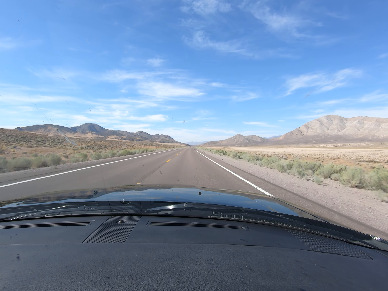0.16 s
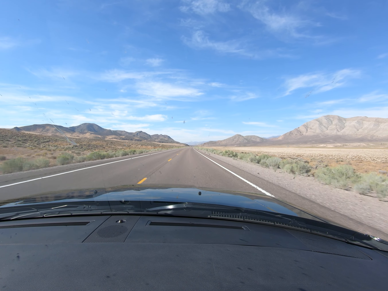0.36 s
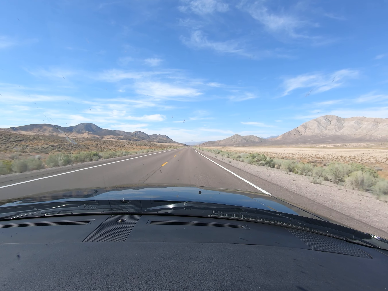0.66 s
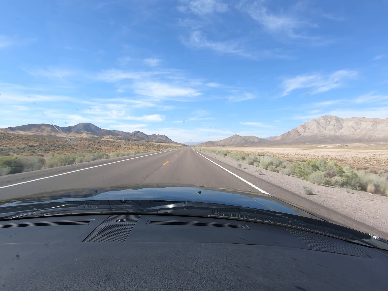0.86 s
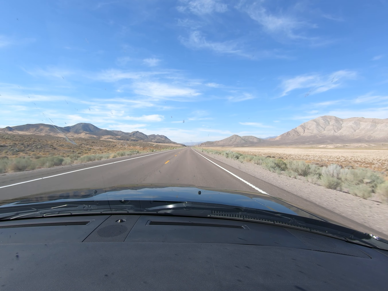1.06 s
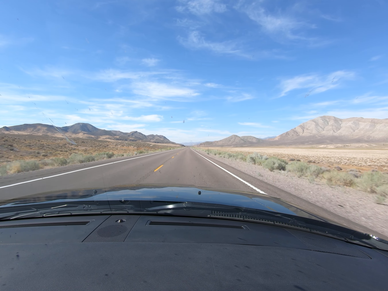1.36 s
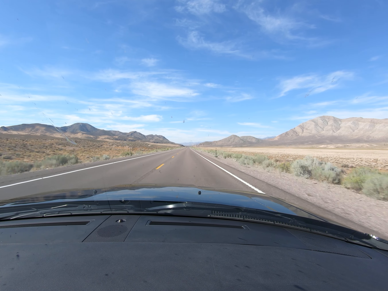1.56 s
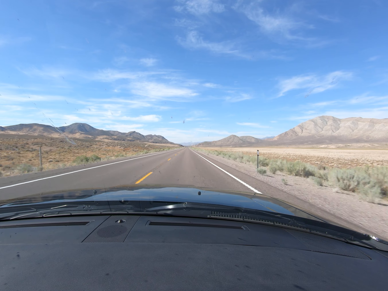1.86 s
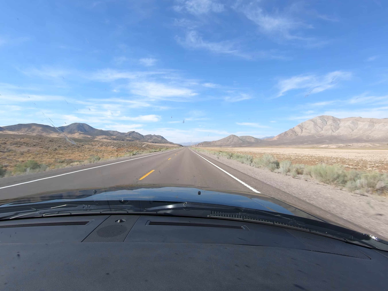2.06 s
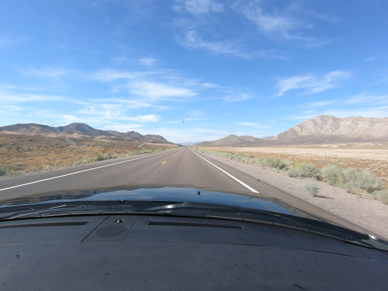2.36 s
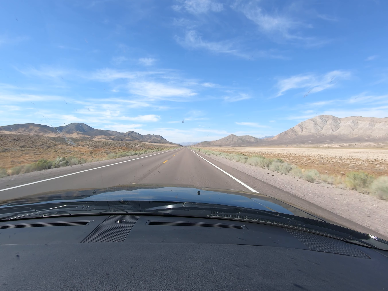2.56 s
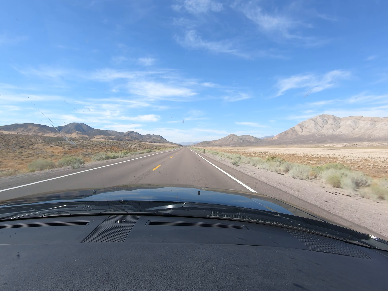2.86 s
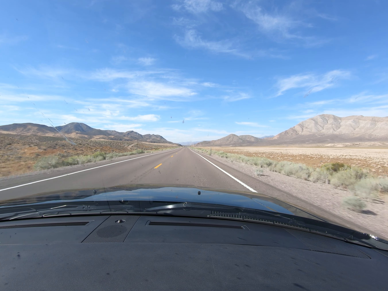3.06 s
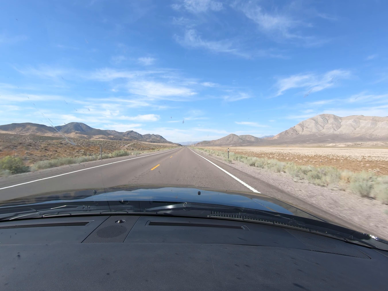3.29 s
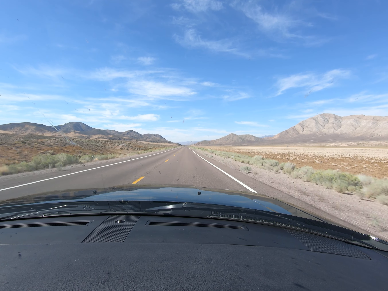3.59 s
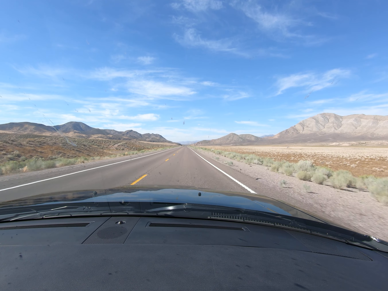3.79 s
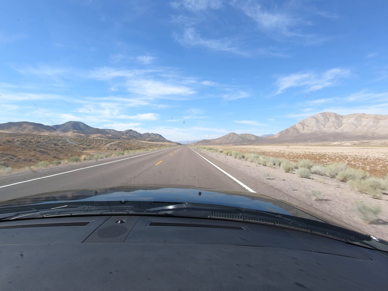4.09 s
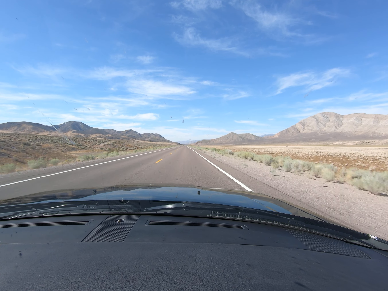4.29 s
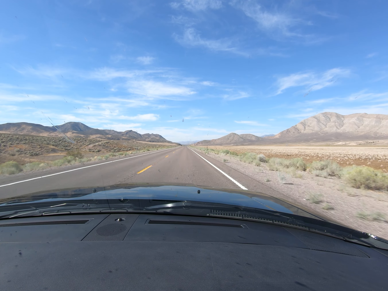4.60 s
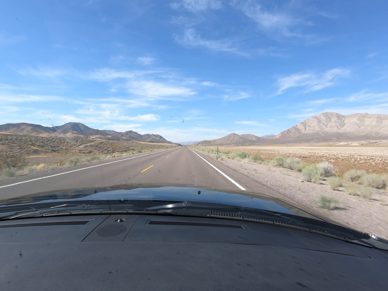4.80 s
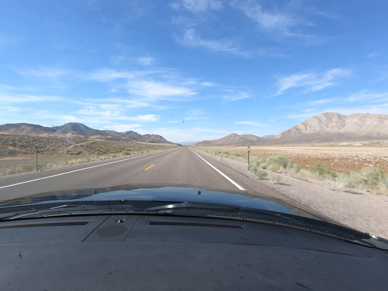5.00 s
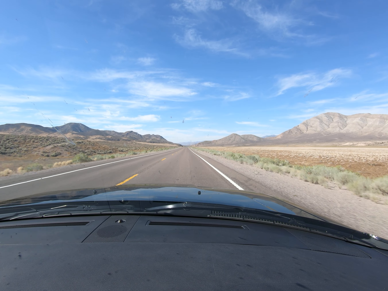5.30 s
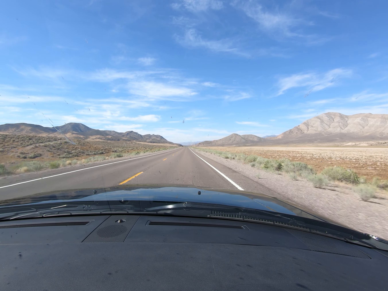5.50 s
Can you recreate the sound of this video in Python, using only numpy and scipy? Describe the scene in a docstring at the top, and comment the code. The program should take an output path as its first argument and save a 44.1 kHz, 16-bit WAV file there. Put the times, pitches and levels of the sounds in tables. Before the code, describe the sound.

A low, bass-heavy car cabin drone with an engine boom rising then backing off, faint air hiss, road thumps and tiny plastic ticks.

```python
"""Inside a car at steady highway speed, heard from a camera microphone behind the windscreen.
Road noise rumbles through the body, tyres hum at multiples of the wheel's turn, and air hisses over the glass.
The engine's shaft tones rise for about three seconds, then ease back under the road noise.
The deep rumble swells softly, ridges drum, a window seal sings, loose plastic knocks, and the trim ticks.
The camera limits the bass and cuts the highest treble."""
import sys
import numpy as np
from scipy import signal
from scipy.fft import rfft, irfft, next_fast_len
from scipy.io import wavfile
from scipy.ndimage import uniform_filter1d, minimum_filter1d, map_coordinates

SR = 44100
rng = np.random.default_rng(int(sys.argv[2]) if len(sys.argv) > 2 else 0)


def waveform_to_disk(signal):
    """Save audio, clipped to [-1, 1], as 16-bit WAV at the path in sys.argv[1]."""
    frames = np.transpose(np.atleast_2d(signal))
    scaled = np.clip(frames, -1, 1) * 32767
    samples = np.round(scaled).astype(np.int16)
    wavfile.write(sys.argv[1], SR, samples)


N = 249165


def amp(db):
    """Decibels to gain."""
    return 10 ** (np.asarray(db) / 20)


def unit(x):
    """Scaled to rms 1."""
    return x / np.sqrt(np.mean(x ** 2) + 1e-20)


def curves(rows):
    """One value per sample for each column after the time."""
    s, *cols = np.transpose(rows)
    return [np.interp(np.arange(N) / SR, s, c) for c in cols]


def wobble(rate):
    """A smooth random curve, rate knots a second."""
    knots = rng.standard_normal(int(N * rate / SR) + 4)
    return map_coordinates(knots, [np.arange(N) * rate / SR])


def swell(s, width):
    """A bell-shaped rise to 1 around time s, down to 1/e one width (s) away."""
    return np.exp(-((np.arange(N) / SR - s) / width) ** 2)


def filtered(x, response):
    """x with its spectrum multiplied by a response of frequency."""
    m = next_fast_len(N + SR // 2)
    return irfft(rfft(x, m) * response(np.fft.rfftfreq(m, 1 / SR)), m)[:N]


def noise(spectrum):
    """Noise of rms 1, coloured by (Hz, relative dB) points on a log frequency axis."""
    f, db = np.transpose(spectrum)

    def colour(hz):
        return amp(np.interp(np.log(hz + 1), np.log(f), db))

    return unit(filtered(rng.standard_normal(N), colour))


def surges(table, spectrum):
    """Coloured noise that swells and sinks once for each (s, dB, half width s) row."""
    envelope = sum(amp(db) * swell(s, width) for s, db, width in table)
    return noise(spectrum) * envelope


def orders(speed, table, waver_db, drift):
    """Tones at multiples of a shaft's speed (Hz), wavering in level (dB) and phase (radians)."""
    angle = 2 * np.pi * np.cumsum(speed) / SR
    total = np.zeros(N)
    for multiple, db in table:
        level = amp(db + waver_db * wobble(3.6))
        phase = drift * wobble(3) + rng.uniform(0, 2 * np.pi)
        total += level * np.sin(multiple * angle + phase)
    return np.sqrt(2) * total  # each tone's rms, not its peak, follows the table


def effort(start, rise):
    """0 to 1: builds from the start, holds, and eases off when the accelerator lifts."""
    lift_s, lift_fall_s = 3.1, 0.73
    t = np.arange(N) / SR
    building = (t - start) / rise
    easing = 1 - (t - lift_s) / lift_fall_s
    share = np.clip(np.minimum(building, easing), 0, 1)
    return np.sin(np.pi / 2 * share) ** 2


def road_and_wind(throttle, strain):
    """Coarse asphalt drives the body, panels, wheel wells and tread; air rushes past the windows."""
    # Noise colours of the body, the panels, the hollow wheel wells, the tread and the air over the glass.
    # Each row: frequency in Hz, level in relative dB.
    body_colour, panel_colour = [(10, -24), (20, -13.5), (27, 0), (42, -0.3), (55, 0), (80, 1.3),
                                 (105, 3.5), (128, 4.2), (155, -8.5), (220, -24), (400, -87), (800, -120)], [(30, -55.5), (90, -30.5), (150, -2.5), (195, 2), (240, -2),
                                               (290, -6), (350, -17.5), (450, -18), (600, -29.5),
                                               (1000, -81.5), (2500, -120)]
    well_colour, tread_colour, air_colour = [(180, -51.5), (270, -3.5), (325, 3.5), (390, 1), (450, -1.5),
                                             (540, -19), (900, -66.5), (2500, -120)], [(250, -25), (430, -2.5), (520, 3.5), (600, 1.7),
                                                           (700, -3.5), (820, -4), (950, -9.5), (1080, -16),
                                                           (1220, -25), (2000, -59), (6000, -120)], [(600, -10), (1300, 1.9),
                                                                          (1700, -1.5), (2150, -5.5),
                                                                          (2950, -7.1), (3500, -7),
                                                                          (4400, -13.5), (5250, -15),
                                                                          (5750, -18.7), (7700, -21.3),
                                                                          (9000, -36.5), (10400, -28.5),
                                                                          (11300, -37.5), (15500, -51.5)]
    # Roar of the wheel wells as the asphalt changes. Each row: time in seconds, level in dB.
    well_levels = [(0, -34), (.6, -39.5), (.82, -31), (1.35, -35), (1.8, -32.5), (2.5, -33.5), (3.3, -30.5),
                   (4.15, -32), (4.9, -32.5), (5.5, -31)]
    # Coarser asphalt that shakes the panels. Each row: centre in seconds, extra dB, half width in seconds.
    coarse_patches = [(2.75, 2, 0.39), (5.501, 4.5, .2)]
    # Sharper grit that brightens the tread. Each row: centre in seconds, level in dB, half width in seconds.
    grit_patches = [(2.66, -50, 0.53)]
    # Colour of the grit's rush. Each row: frequency in Hz, level in relative dB.
    grit_colour = [(400, -49.5), (800, -6.5), (950, 3), (1080, -4), (1250, -8), (1600, -18), (2500, -23.5),
                   (5000, -48.5), (12000, -120)]

    coarse_db = sum(db * swell(s, width) for s, db, width in coarse_patches)
    gust_db = 1.5 * swell(3.15, width=0.96)  # one soft gust over the car
    roar_db, = curves(well_levels)
    body = amp(-15.5 - 0.75 * throttle + gust_db) * noise(body_colour)
    panels = amp(-26 + coarse_db) * noise(panel_colour)
    roar = amp(roar_db) * noise(well_colour)
    tread = amp(-34 + 1 * strain + 0.13 * wobble(8.1)) * noise(tread_colour)
    air = amp(-51 - 0.14 * strain + gust_db + 0.51 * wobble(25)) * noise(air_colour)
    return body + panels + roar + tread + air + surges(grit_patches, grit_colour)


def tyre_hum(wheel, throttle):
    """Uneven tyres shake the cabin at multiples of the wheel's turn, most when the car coasts at speed."""
    # Tones of the turning tyres. Each row: multiple of the wheel's turn, level in relative dB.
    tyre_tones = [(2.1, -18), (5, -21.5), (8, 2.5), (16, -15), (28, -21.5)]
    coast_db, pull_db, db_per_hz = -19, -3.5, 4  # at top wheel speed; change under throttle; speed slope
    hum_db = coast_db + pull_db * throttle + db_per_hz * (wheel - wheel.max())
    return amp(hum_db) * orders(wheel, tyre_tones, waver_db=.8, drift=.13)


def engine(wheel, throttle, strain):
    """Throttle lifts the revs, the firing orders' boom and a gear whine; strain adds growl and dims the whine."""
    # Belt pulley and firing orders. Each row: multiple of the crank's turn, level in relative dB.
    boom_tones = [(1.72, -2.5), (2, -1.5), (4, 2.8), (5, -14), (6, -7.5)]
    # Orders and gear tones that rise under load. Each row: multiple of the crank's turn, level in relative dB.
    growl_tones = [(3, 6.5), (7, 2.3), (8, -7.5), (9, -7.5), (10, -5), (24, -23), (30.5, -27)]
    # Gear whine at full throttle without strain. Each row: multiple of the crank's turn, level in dB.
    whine_tones = [(13, -43.5), (19, -43.5)]
    # Crank turns per wheel turn: the converter slips under load.
    coast_ratio, pull_ratio = 2.66, 2.98
    crank = wheel * (coast_ratio + (pull_ratio - coast_ratio) * throttle)
    boom = amp(-37 + 13.5 * throttle) * orders(crank, boom_tones, waver_db=0.45, drift=0.033)
    growl = amp(-42.5 + 10.5 * strain) * orders(crank, growl_tones, waver_db=0.0, drift=0.13)
    whine_gain = throttle * amp(-4.5 * strain)
    whine = whine_gain * orders(crank, whine_tones, waver_db=6.0, drift=0.13)
    return boom + growl + whine


def low_swells():
    """Brief, soft swells of the deep rumble: low noise that rises and sinks."""
    # Swells. Each row: centre in seconds, level in dB, half width in seconds.
    swell_rows = [(.5, -19.5, 0.16), (1.95, -22, 0.082), (2.5, -16, 0.064), (2.95, -24, 0.065)]
    # Colour of the deep rumble. Each row: frequency in Hz, level in relative dB.
    swell_colour = [(18, -31.5), (32, 2.5), (45, 1), (70, -30), (200, -120)]
    return surges(swell_rows, swell_colour)


def ridges():
    """The tyres drum briefly over ridges: noise coloured by the floor pan's answer."""
    # Ridges under the tyres. Each row: centre in seconds, level in dB, half width in seconds.
    ridge_rows = [(2.95, -15.5, 0.018), (4.17, -22.5, 0.13), (5.48, -10.5, 0.026)]
    # The floor pan's answer. Each row: frequency in Hz, level in relative dB.
    drum_colour = [(80, -40), (135, 4.5), (200, -1.5), (250, -14.5), (400, -43.5), (900, -120)]
    return surges(ridge_rows, drum_colour)


def knocks():
    """Loose plastic taps against the dashboard: noise with a quick attack and a short decay."""
    # Dull taps. Each row: start in seconds, level in dB ahead of attack and decay.
    taps = [(.118, -43), (3.546, -57), (4.227, -45.5), (4.246, -42.5), (4.325, -52)]
    # Colour of the plastic. Each row: frequency in Hz, level in relative dB.
    plastic_colour = [(600, -28), (1200, -11), (1550, 6), (2000, 2.5), (2700, -8), (5000, -14), (6500, -20),
                      (8000, -21.5), (12000, -50.5), (16000, -73.5)]
    attack_s, t60_s = 0.0011, 0.051
    envelope = np.zeros(N)
    for s, db in taps:
        t = np.maximum(np.arange(N) / SR - s, 0)
        envelope += amp(db - 60 * t / t60_s) * (1 - np.exp(-t / attack_s))
    return noise(plastic_colour) * envelope


def trim():
    """Hard dashboard trim ticks: each contact is a tiny scrape into high resonances."""
    # Contacts. Each row: start in seconds, level in dB ahead of attack and decay, brightness in dB per octave.
    contacts = [(0.117, -50, -19), (.122, -50, -37), (.138, -57.5, 11), (.142, -56.5, 2),
                (3.545, -55.5, 10), (3.5485, -58, 3), (3.552, -62.5, -3)]
    # Resonances of the trim. Each row: centre in Hz, full width in Hz, level in relative dB before brightness.
    resonances = [(6440, 250, 6), (7830, 1000, -3.5), (9250, 600, -10), (10600, 900, -7.5),
                  (12200, 600, -4.5), (15070, 400, -14)]
    attack_s, t60_s = .0004, .04
    out = np.zeros(N + SR)
    t = np.arange(SR // 8) / SR
    hz = np.fft.rfftfreq(len(t), 1 / SR)
    for s, db, bright_db in contacts:
        colour = np.zeros(len(hz))
        for centre, width, level in resonances:
            octaves = np.log2(centre / resonances[0][0])  # above the first resonance
            colour += amp(level + bright_db * octaves) / (1 + (2 * (hz - centre) / width) ** 2)
        scrape = unit(irfft(rfft(rng.standard_normal(len(t))) * colour, len(t)))
        envelope = amp(db - 60 * t / t60_s) * (1 - np.exp(-t / attack_s))
        out[round(s * SR):][:len(t)] += envelope * scrape
    return out[:N]


def rustles():
    """Something light shifts in soft, short scuffs of coloured noise."""
    # Scuffs in the cabin. Each row: centre in seconds, level in dB, half width in seconds.
    scuffs = [(4.24, -58, .022), (4.335, -59, .014), (4.59, -57.5, .025), (4.69, -58.5, .02)]
    # Colour of the scuffs. Each row: frequency in Hz, level in relative dB.
    scuff_colour = [(400, -55), (800, -6), (1500, 1.5), (4000, -1), (8000, -6.5), (10000, -35),
                    (15000, -53)]
    return surges(scuffs, scuff_colour)


def faint_tone():
    """A faint, very short pure tone at 8.2 kHz."""
    tone = np.sin(2 * np.pi * 8200 * np.arange(N) / SR)
    return amp(-65) * swell(2.054, width=.011) * tone


def whistle(strain):
    """Air at a window seal sings faintly in narrow resonances that waver with the flow."""
    # Seal resonances. Each row: centre in Hz, half width in Hz, rms level in dB before strain and waver.
    seal_bands = [(2526, 46, -64.5), (2645, 48, -67), (2800, 80, -68.5)]
    waver_db, waver_hz, strain_db = -0.6, 6, 1
    out = np.zeros(N)
    sway = 2 * np.pi * np.cumsum(waver_hz * wobble(4)) / SR
    for centre, width, db in seal_bands:
        band = unit(filtered(rng.standard_normal(N), lambda hz: 1 / (1 + ((hz - centre) / width) ** 2)))
        shifted = np.real(signal.hilbert(band) * np.exp(1j * sway))  # pitch sways by a few Hz
        out += amp(db + strain_db * strain + waver_db * wobble(6.5)) * shifted
    return out


def scene():
    """Road speed and one press of the accelerator shape the drone; small, brief sounds join it."""
    # Road speed, up through the pull and down after it. Each row: time in seconds, wheel turns per second.
    wheel_speed = [(0, 11.45), (3, 12.09), (5.65, 11.93)]
    wheel, = curves(wheel_speed)
    throttle = effort(start=.33, rise=.32)
    strain = effort(start=1.39, rise=0.5)  # the engine labours later in the pull
    drone = road_and_wind(throttle, strain) + tyre_hum(wheel, throttle) + engine(wheel, throttle, strain)
    low = low_swells() + ridges()
    small = knocks() + trim() + rustles() + faint_tone()
    return (drone + low + small + whistle(strain))[None]


def limiter(x, ceiling, hold):
    """The gain ducks smoothly around every peak above the ceiling, over a hold in seconds."""
    span = max(int(hold * SR), 2)
    needed = np.minimum(1, ceiling / (np.abs(x) + 1e-9))
    return x * uniform_filter1d(minimum_filter1d(needed, span), span)


def record(dry):
    """The camera limits the bass on its own and keeps nothing above its band limit."""
    top_hz = 15700
    bass = filtered(dry[0], lambda hz: 1 / (1 + (hz / 350) ** 4))
    held = limiter(bass, ceiling=.425, hold=.015)
    rest = dry[0] - bass
    return filtered(held + rest, lambda hz: hz < top_hz)[None]


dry = scene()
out = record(dry)
waveform_to_disk(out)
```